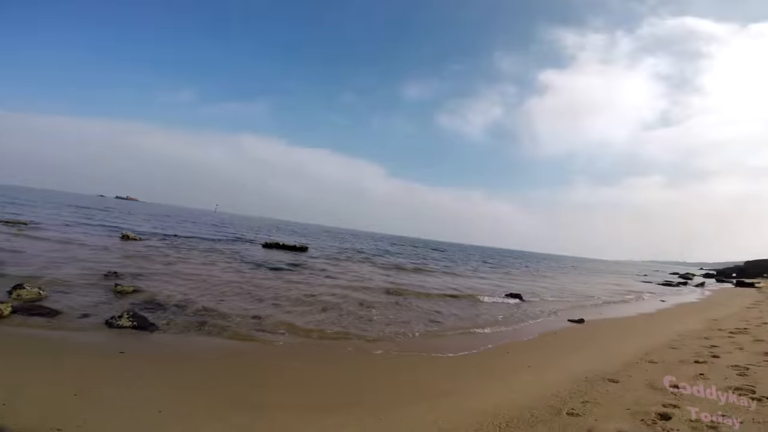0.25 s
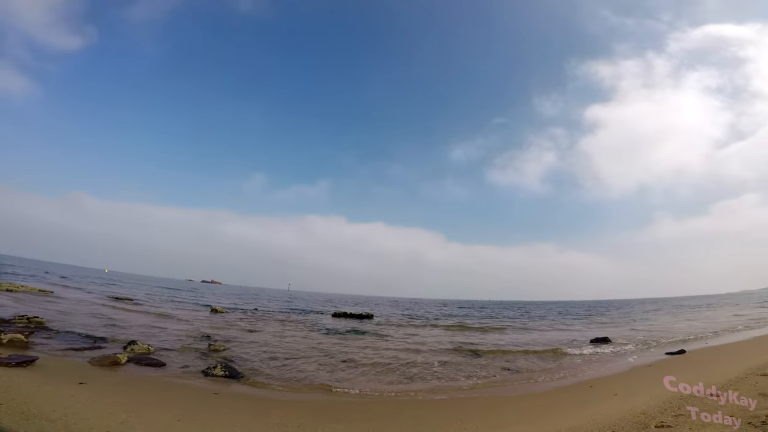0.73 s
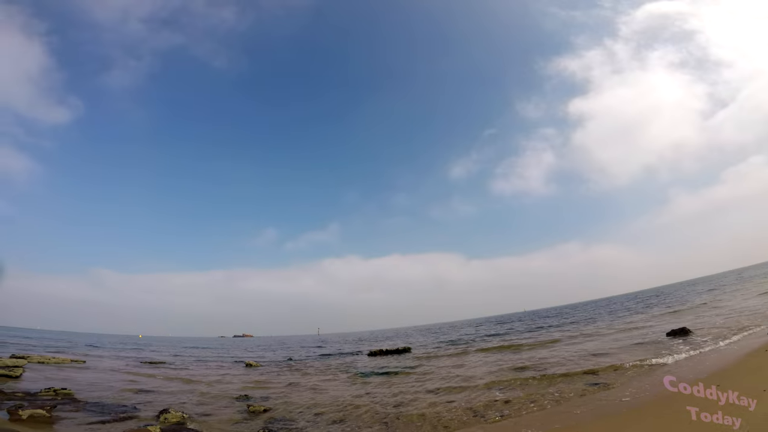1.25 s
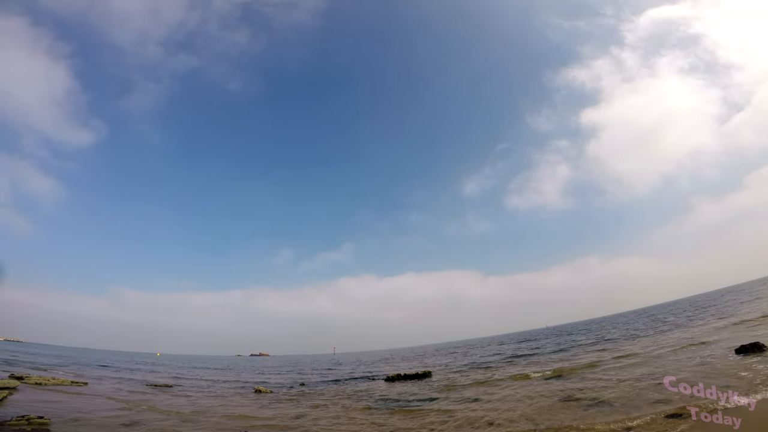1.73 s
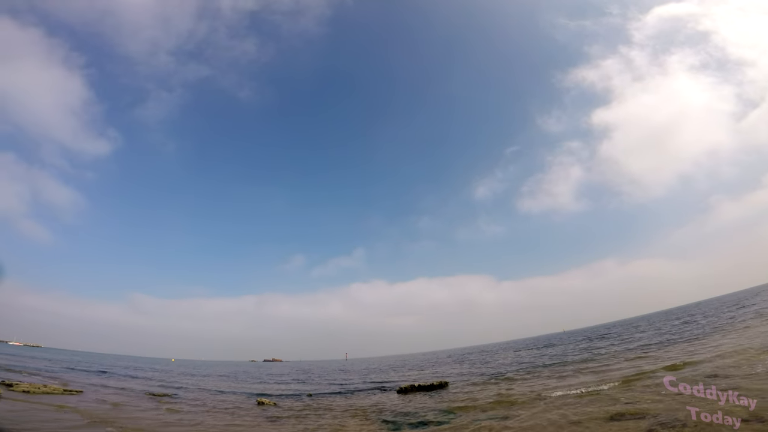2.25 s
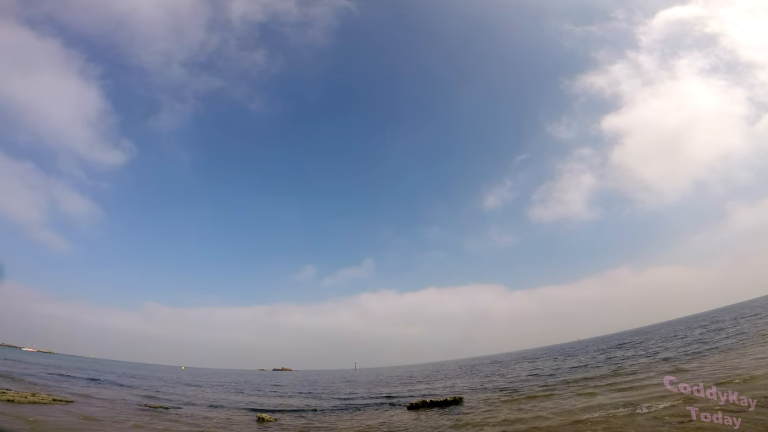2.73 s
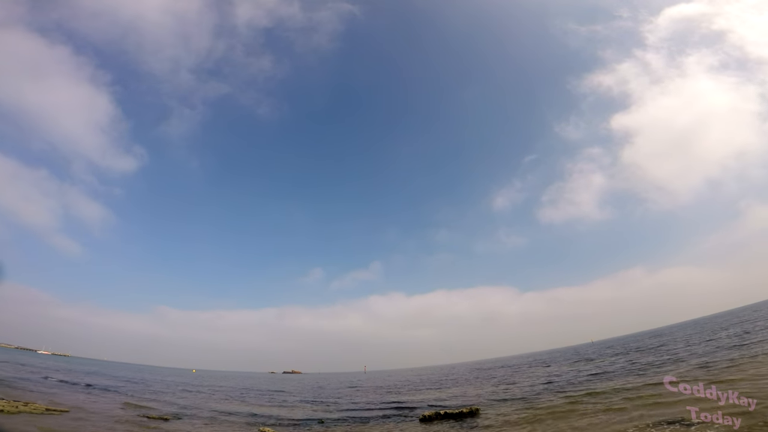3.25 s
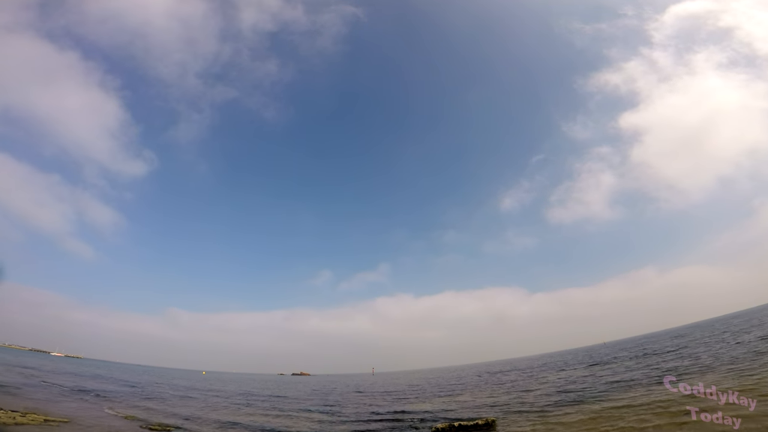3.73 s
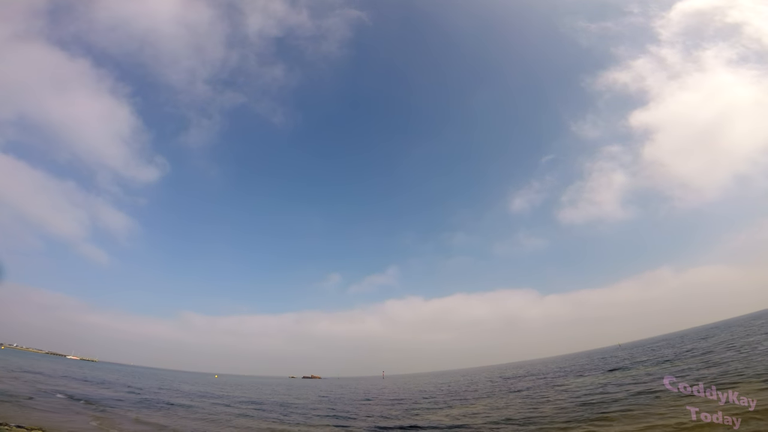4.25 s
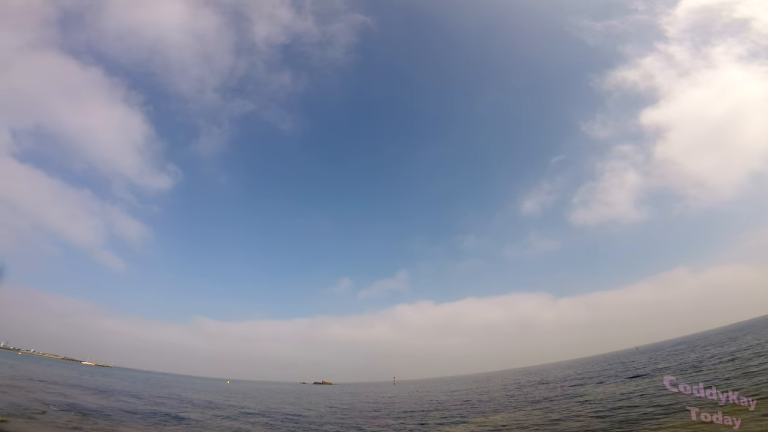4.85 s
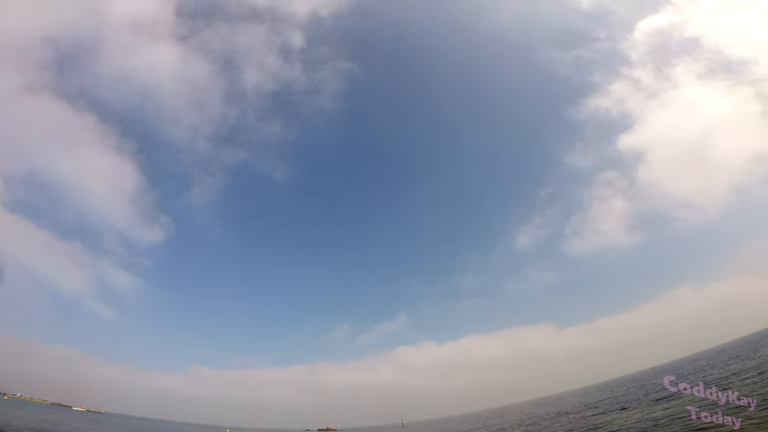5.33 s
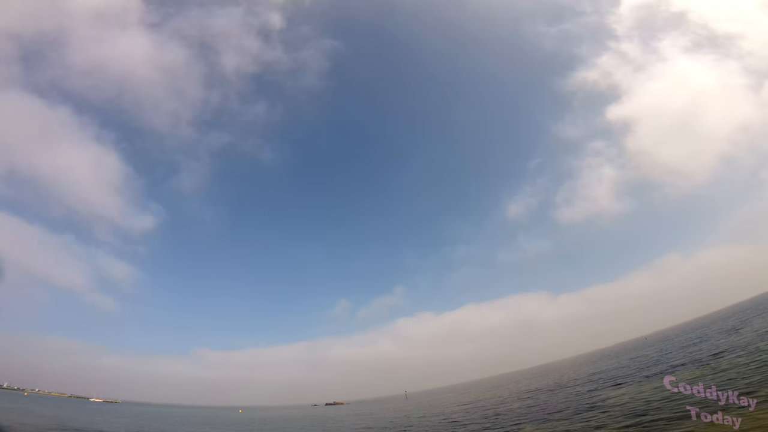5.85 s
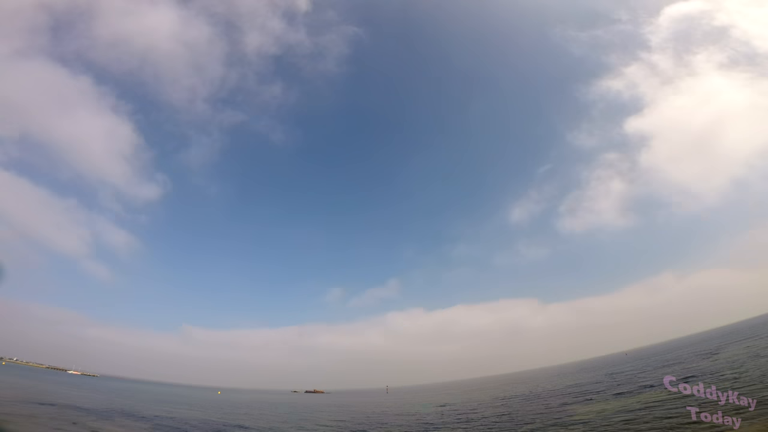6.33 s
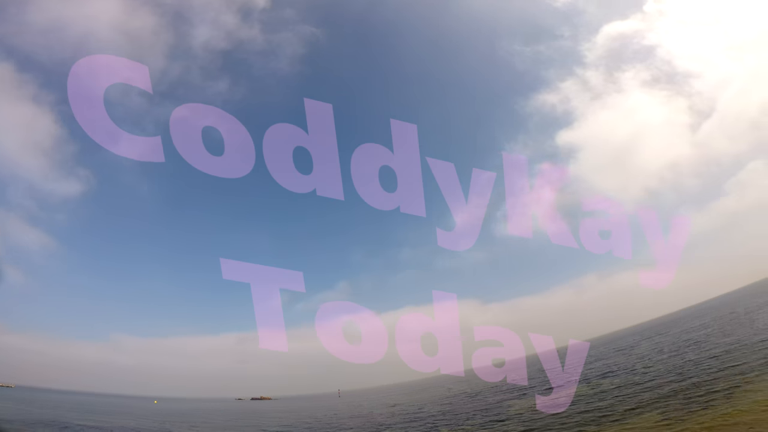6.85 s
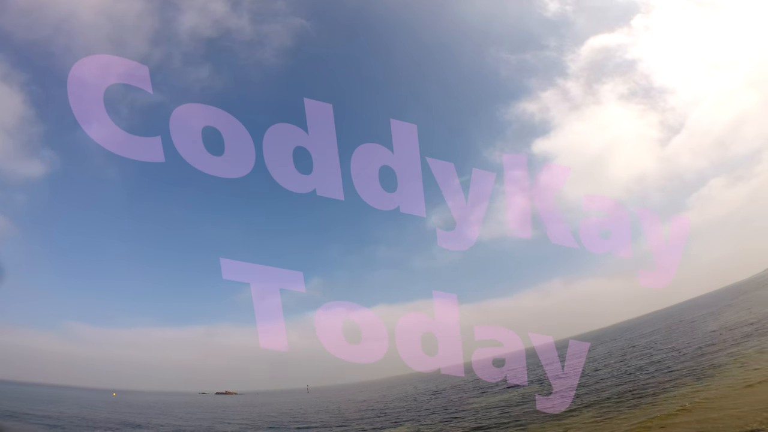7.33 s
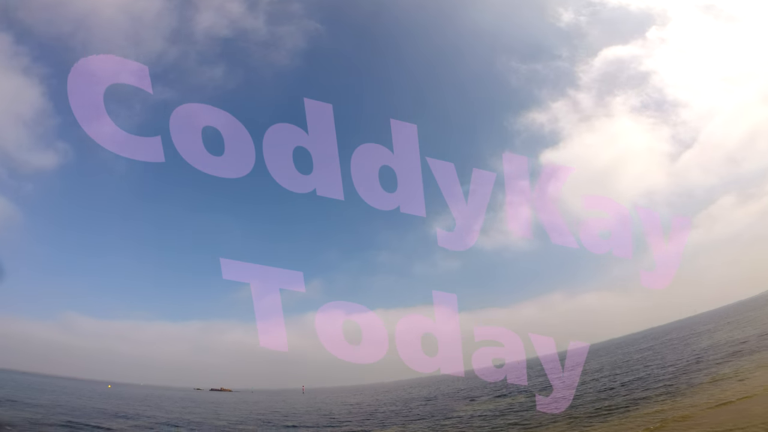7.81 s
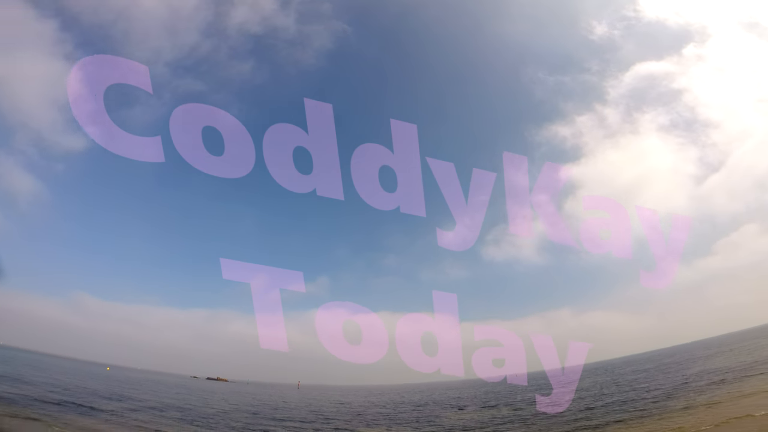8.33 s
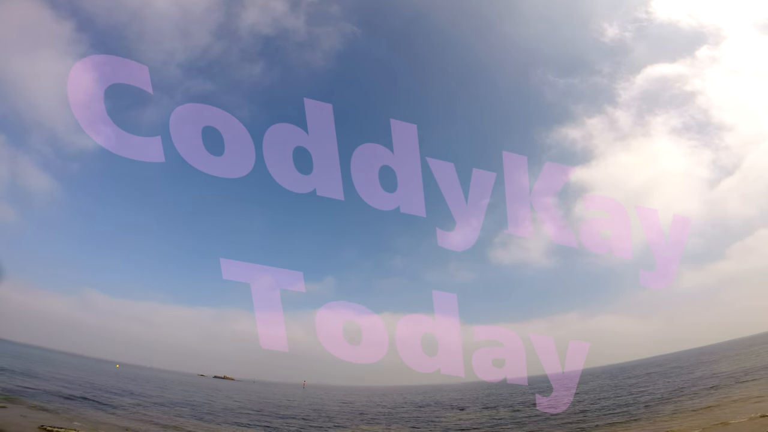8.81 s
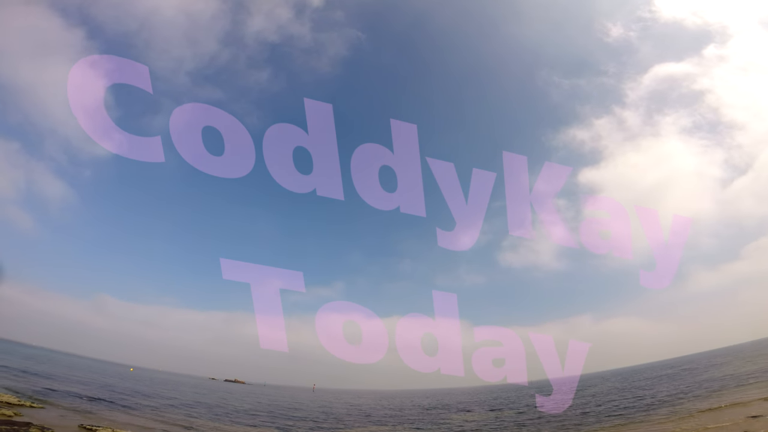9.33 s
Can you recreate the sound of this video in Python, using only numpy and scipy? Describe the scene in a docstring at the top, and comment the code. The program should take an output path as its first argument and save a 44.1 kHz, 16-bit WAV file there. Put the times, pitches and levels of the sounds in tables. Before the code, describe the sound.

A small drone hums and whines up close, its pitch dipping and swooping as propeller hiss and wind gradually build.

```python
"""Racing quadcopter over a beach

Heard from the camera on its frame. Four motors with three-blade propellers run at slightly
different speeds: unbalance shakes the frame into a beating hum; the blades whine and chop the air
into hiss. The throttle dips and is punched once. Wind on the microphone builds."""
import sys
import numpy as np
from scipy.fft import rfft, irfft, next_fast_len
from scipy.io import wavfile
from scipy.ndimage import uniform_filter1d, map_coordinates

SR = 44100
rng = np.random.default_rng(int(sys.argv[2]) if len(sys.argv) > 2 else 0)


def inscribe(sig):
    """Save sig as 16-bit PCM at rate SR to the path in sys.argv[1].

    A 1-D sig is mono; a 2-D sig holds one channel per row.
    Samples are clipped to [-1, 1] before scaling.
    """
    pcm = np.round(np.clip(np.atleast_2d(sig).T, -1, 1) * 32767)
    wavfile.write(sys.argv[1], SR, pcm.astype(np.int16))


N = 422478
BLADES = 3

# Each row, one propeller: relative dB of blade tone, low overtones, high overtones.
PROPELLER_DB = [(-12.5, -2, 3), (1.5, 0.5, -1.5), (-7.5, -1.5, 2), (-13, -3, -1.5)]


def amp(db):
    """Decibels to gain."""
    return 10 ** (np.asarray(db) / 20)


def unit(x):
    """Scale to rms 1."""
    return x / np.sqrt(np.mean(x ** 2) + 1e-20)


def db_at(spectrum, hz):
    """Interpolate (Hz, dB) rows on a log frequency axis."""
    knot_hz, knot_db = np.transpose(spectrum)
    return np.interp(np.log(hz + 1), np.log(knot_hz + 1), knot_db)


def curves(rows):
    """Per-sample curve for each column after the time."""
    time_s, *columns = np.transpose(rows)
    return np.array([np.interp(np.arange(N) / SR, time_s, column) for column in columns])


def wobble(rate_hz):
    """Smooth random curve, rate_hz knots a second."""
    grid = np.linspace(0, N, num=8192)
    knots = rng.standard_normal(4096)
    return np.interp(np.arange(N), grid, map_coordinates(knots, [grid * rate_hz / SR], mode="wrap"))


def filtered(x, response):
    """Apply a gain given as a function of Hz."""
    size = next_fast_len(N + SR // 2)
    return irfft(rfft(x, size) * response(np.fft.rfftfreq(size, 1 / SR)), size)[:N]


def coloured(x, spectrum):
    """Shape x by (Hz, dB) rows; rms 1."""
    return unit(filtered(x, lambda hz: amp(db_at(spectrum, hz))))


def wind(trim_db=3.5, lumps_db=1.2):
    """Airflow buffets the microphone port in small lumps."""
    # Each row: time in seconds, level in dB before trim.
    strength = [(0, -44), (1.2, -43.5), (2, -37.5), (3.2, -41), (4.5, -34.5), (5.8, -35.5), (6.15, -30.5),
                (7.2, -30), (7.9, -33), (8.4, -28.5), (8.9, -26), (9.58, -30)]
    # Each row: frequency in Hz, relative noise density in dB.
    spectrum = [(10, -46), (25, 0.5), (50, 1.5), (75, 5), (110, 3), (200, 5), (500, -23.5), (2000, -43)]
    buffet = amp(lumps_db * wobble(12)) * coloured(rng.standard_normal(N), spectrum)
    return amp(curves(strength)[0] + trim_db) * unit(buffet)


def arm_shudder(speeds_hz, level_db=-21.5, ref_hz_per_s=600, window_s=0.72):
    """Quick speed changes of motor 2 jolt the arms; level_db holds at the reference slew."""
    # Each row: frequency in Hz, relative noise density in dB.
    spectrum = [(100, -40), (180, 8), (230, 6), (300, 1.5), (370, -14), (700, -54)]
    smooth_hz = uniform_filter1d(speeds_hz[1], SR // 10)
    slew_hz_per_s = uniform_filter1d(np.abs(np.gradient(smooth_hz)) * SR, int(window_s * SR))
    return amp(level_db) * slew_hz_per_s / ref_hz_per_s * coloured(rng.standard_normal(N), spectrum)


def chopped_air(blade_phases, spectrum, depth, flicker_db):
    """Turbulence pulsing with each blade pass."""
    chop = np.exp(depth * sum(np.cos(phase) for phase in blade_phases))
    return coloured(rng.standard_normal(N) * chop * amp(flicker_db * wobble(60)), spectrum)


def overtones(speeds_hz, blade_phases, levels_db, spectrum, orders, eddies, hop=64):
    """Blade-pass harmonics; eddies scatter the strength and phase of each."""
    total, power = np.zeros(N), 0
    for db, hz, phase in zip(levels_db, speeds_hz, blade_phases):
        gusts = [1 + eddies * (wobble(25) + 1j * wobble(25)) for _ in range(2)]
        for k in orders:
            gain = amp(db + db_at(spectrum, BLADES * k * hz[::hop]))
            power += gain ** 2
            gust = np.roll(gusts[k % 2], rng.integers(N))
            angle = k * phase + 2 * np.pi * rng.random()
            total += np.repeat(gain, hop)[:N] * (gust.real * np.sin(angle) + gust.imag * np.cos(angle))
    return unit(total / np.repeat(np.sqrt(power), hop)[:N])


def tip_scream(speeds_hz, blade_phases):
    """High overtones from the sharp pulses of the blade tips."""
    # Each row: frequency in Hz, relative level in dB.
    spectrum = [(1650, -5), (1850, 13.5), (2250, 5), (2750, 3.5), (3400, 0), (4200, -7.5), (5100, -0.5),
                (5900, -15.5), (6600, 0), (8000, -15), (11500, -24)]
    levels_db = [high for _, _, high in PROPELLER_DB]
    return overtones(speeds_hz, blade_phases, levels_db, spectrum, orders=range(4, 15), eddies=.3)


def blade_whine(speeds_hz, blade_phases):
    """Low overtones, swelling as the propellers bite into uneven air."""
    # Each row: frequency in Hz, relative level in dB.
    spectrum = [(800, -5), (1000, 5.5), (1110, 13), (1260, -11.5), (1370, 2), (1500, 4.5), (1700, 8),
                (1900, -0.5), (2250, -2), (2600, 4)]
    # Each row: time in seconds, gain in dB.
    bite = [(0, 11.5), (.35, 7), (.7, -5), (2.4, -0.5), (3.6, 1.5), (4.7, 1), (5.1, 1.5), (6.4, -4.5),
            (6.9, 2.5), (7.4, -0.5), (8.25, 4.5), (9, -4)]
    levels_db = [low for _, low, _ in PROPELLER_DB]
    whine = overtones(speeds_hz, blade_phases, levels_db, spectrum, orders=(2, 3), eddies=.22)
    return amp(curves(bite)[0]) * whine


def blade_tone(blade_phases, waver_db=1.23):
    """The push of each passing blade: each propeller's main pitch."""
    return unit(sum(amp(db + waver_db * wobble(25)) * np.sin(phase)
                    for (db, _, _), phase in zip(PROPELLER_DB, blade_phases)))


def frame_hum(speeds_hz, angles, unbalance_db=(0, 0, -7, -17), second_order_db=-27, rattle_db=-12,
              buzz_db=-23, buzz_hz=675, buzz_width_hz=25):
    """Unbalance shakes the frame once a turn; four close tones beat."""
    # Each row: shaft speed in Hz, relative transfer through the frame in dB.
    transfer = [(135, -17), (152, -5), (165, 1), (178, -2), (187, 0), (194, -1), (201, 3), (208, 9.5),
                (250, 4), (275, -7), (290, -2)]
    # Broad frame resonance. Each row: frequency in Hz, relative noise density in dB.
    resonance = [(60, -85), (110, -22.5), (150, -1.5), (185, -9.5), (220, -5.5), (280, -33.5), (450, -46),
                 (900, -84)]
    # Each row: time in seconds, gain of the shaking in dB.
    strength = [(0, -14), (.38, -11), (.7, -2), (2.05, -1), (2.4, 1), (3.7, -1), (5.15, -2), (5.55, 3.5),
                (6.05, -4), (6.75, -2.3), (7.8, 2.3), (8.45, -0.9), (9.58, 0)]
    shares = np.array([amp(db + db_at(transfer, hz)) for db, hz in zip(unbalance_db, speeds_hz)])
    shares /= np.sqrt(np.sum(shares ** 2, axis=0))
    shake = sum(share * (np.sin(angle) + amp(second_order_db) * np.sin(2 * angle))
                for share, angle in zip(shares, angles))
    # Motor 2's fourth order sings near a narrow frame resonance.
    detuning = (4 * speeds_hz[1] - buzz_hz) / buzz_width_hz
    shake += amp(buzz_db) * np.sin(4 * angles[1]) / np.hypot(1, detuning)
    rattle = amp(rattle_db) * coloured(rng.standard_normal(N), resonance)
    return amp(curves(strength)[0]) * unit(unit(shake) + rattle)


def throttle_hz():
    """Speed offset common to all motors."""
    # Each row: start, glide, hold and return in seconds, speed change in Hz.
    moves = [(0.048, 0.27, 0.085, 0.18, -37), (1.779, .14, .22, 0.19, -10), (4.7, 0.098, 2.396, .15, -16),
             (5.213, .13, 0.011, 0.17, 113), (6.261, .13, .23, .13, -25), (7.98, 0.29, 0.063, 0.22, -23),
             (8.72, 0.16, 0.0192, .3, 5.5)]
    t = np.arange(N) / SR
    offset_hz = np.zeros(N)
    for start_s, glide_s, hold_s, return_s, change_hz in moves:
        end_s = start_s + glide_s + hold_s + return_s
        ramp = np.clip(np.minimum((t - start_s) / glide_s, (end_s - t) / return_s), 0, 1)
        offset_hz += change_hz * np.sin(np.pi / 2 * ramp) ** 2
    return offset_hz


def shafts(hunt=0.00188, flutter=0.001158):
    """Shaft speeds in Hz and angles in radians; random drift stands for flight controller trim."""
    # Speeds that hold attitude. Each row: time in seconds, motors 1 to 4 in Hz.
    cruise = [(0, 212, 212, 209, 197), (.6, 204, 175, 187, 187.5), (1.13, 216, 184, 191, 202.7),
              (1.36, 202, 168, 172, 185.3), (1.85, 203, 165, 168, 177.2), (2.35, 209, 168, 175, 183.2),
              (3.3, 207.5, 170, 183, 184.9), (3.5, 201, 170, 184.5, 185.2), (4.7, 197, 175, 188, 183.8),
              (5.6, 191, 176, 185, 180.4), (6.25, 197, 182, 190, 181.5), (6.55, 193, 175.5, 192.5, 175),
              (6.76, 190, 189, 180, 186.7), (7.27, 197, 196, 186, 193.6), (7.5, 200.5, 186, 189, 185.2),
              (7.95, 202, 189, 192, 184.9), (8.3, 194, 194, 182, 187.7), (8.7, 194.5, 184, 186, 177.6)]
    speeds_hz = [hz * (1 + hunt * wobble(14) + flutter * wobble(70))
                 for hz in curves(cruise) + throttle_hz()]
    return speeds_hz, [2 * np.pi * (np.cumsum(hz) / SR + rng.random()) for hz in speeds_hz]


def scene(cruise_hz=180, hum_speed_cap_db=1.0):
    """Hum and propeller layers follow airflow and shaft speed; shudder and wind add on top."""
    # Flow through the propellers. Each row: time in seconds, strength in dB.
    airflow = [(0, -20.5), (.35, -20), (.65, -14), (1.6, -13), (2.1, -10.5), (3, -10), (3.6, -7.5),
               (5.2, -3.7), (5.56, -10), (5.85, -6.5), (6.1, -1.5), (7.1, -0.35), (7.85, -4), (8.25, -1.8),
               (8.6, -0.1), (9.58, 1)]
    # Wash around the frame, blade hiss. Each row: frequency in Hz, relative noise density in dB.
    wash_spectrum = [(100, -41), (230, -21), (300, 1.5), (395, 9.5), (500, 11.5), (620, 6), (850, 0),
                     (1100, 4.5), (1400, -3.5), (2000, -3), (2800, -8.5), (4500, -57.5), (9000, -68)]
    hiss_spectrum = [(1500, -2.5), (2500, -6.5), (3200, -0.5), (4150, -9.5), (5200, 0.5), (5900, -6),
                     (6600, -0.5), (8000, -4.5), (9700, -5.5), (10700, -15.5), (11700, -28.5), (12800, -35),
                     (14000, -31), (15200, -47)]
    # Each law: base gain in dB, dB per dB of airflow, dB per dB of shaft speed over cruise.
    hum_law = (-14.5, 0.54, 1.56)
    wash_law = (-27.5, 0.82, -0.33)
    hiss_law = (-31.5, 0.95, 0.86)
    tone_law = (-21.5, 0.78, 0.031)
    whine_law = (-28, 1.29, 1.1)
    scream_law = (-37.2, .8, 2.2)

    def gain(law, speed_db):
        base_db, per_air, per_speed = law
        return amp(base_db + per_air * air_db + per_speed * speed_db)

    speeds_hz, angles = shafts()
    blade_phases = [BLADES * angle for angle in angles]
    air_db = curves(airflow)[0]
    speed_db = 20 * np.log10(np.mean(speeds_hz, axis=0) / cruise_hz)
    hum = gain(hum_law, np.minimum(speed_db, hum_speed_cap_db)) * frame_hum(speeds_hz, angles)
    layers = [(wash_law, chopped_air(blade_phases, wash_spectrum, depth=.2, flicker_db=.9)),
              (hiss_law, chopped_air(blade_phases, hiss_spectrum, depth=.17, flicker_db=.7)),
              (tone_law, blade_tone(blade_phases)),
              (whine_law, blade_whine(speeds_hz, blade_phases)),
              (scream_law, tip_scream(speeds_hz, blade_phases))]
    propellers = sum(gain(law, speed_db) * sound for law, sound in layers)
    return (hum + propellers + arm_shudder(speeds_hz) + wind())[None]


def record(dry, ceiling=.68, cutoff_hz=15200):
    """The camera rounds off the largest peaks and limits the band."""
    rounded = dry[0] / (1 + np.abs(dry[0] / ceiling) ** 8) ** (1 / 8)
    return filtered(rounded, lambda hz: hz < cutoff_hz)[None]


dry = scene()
out = record(dry)
inscribe(out)
```